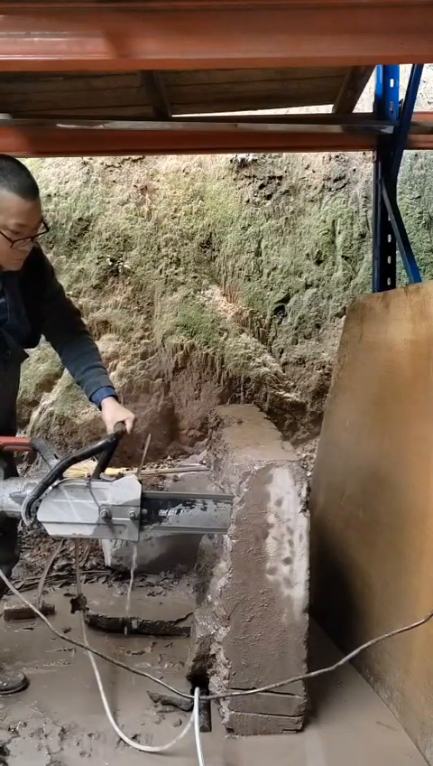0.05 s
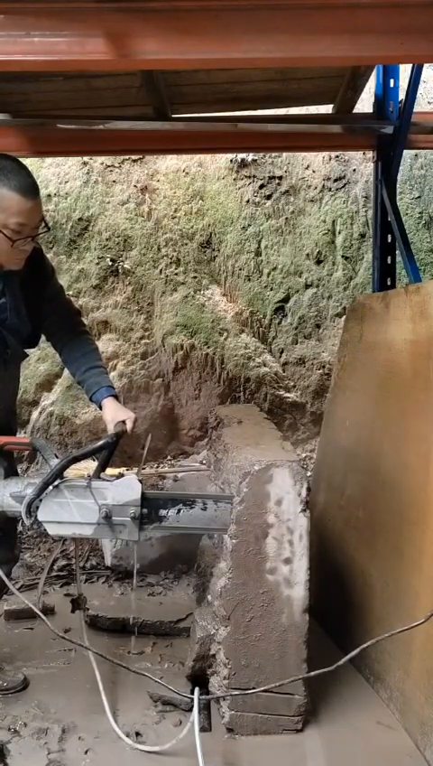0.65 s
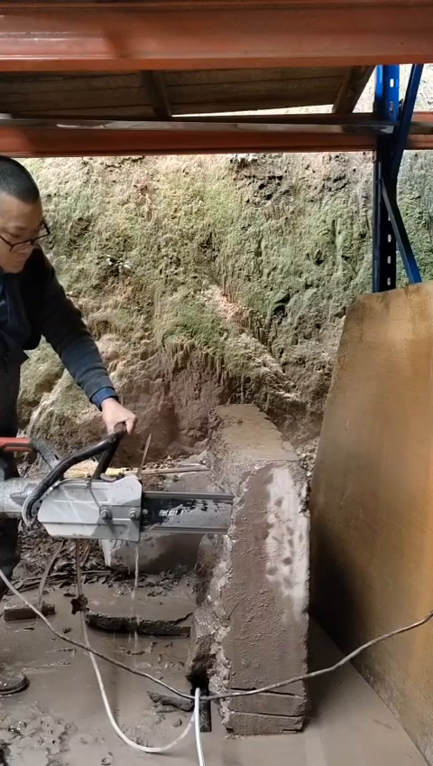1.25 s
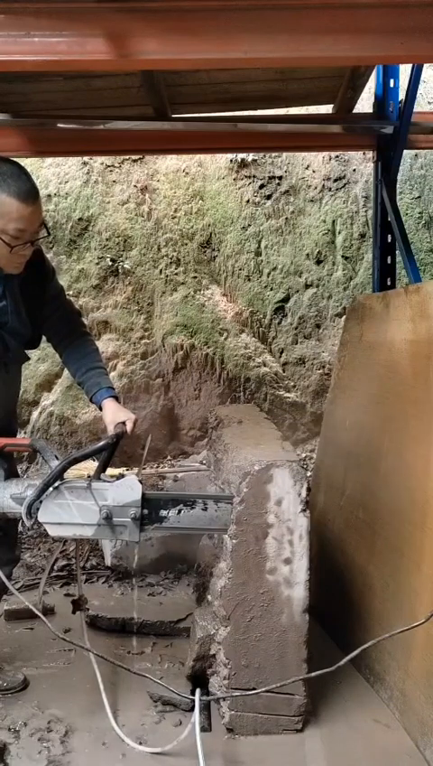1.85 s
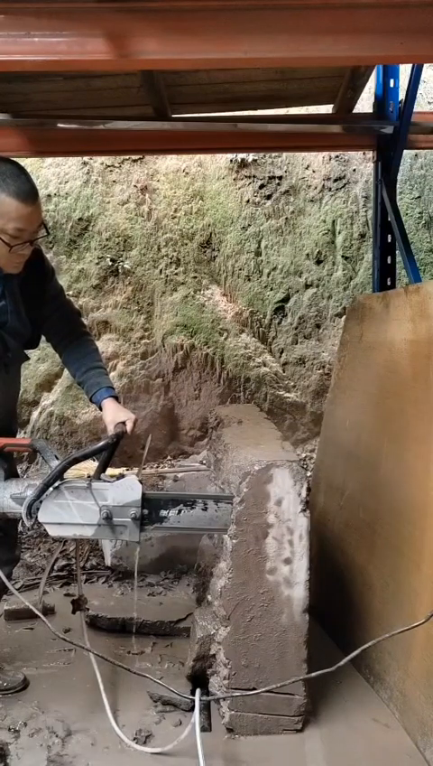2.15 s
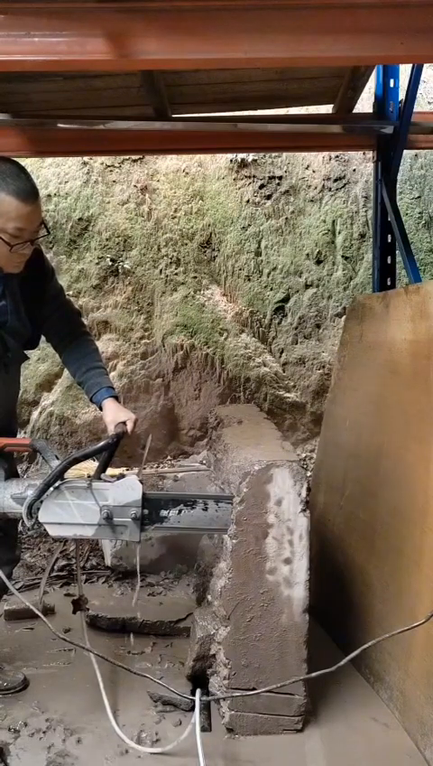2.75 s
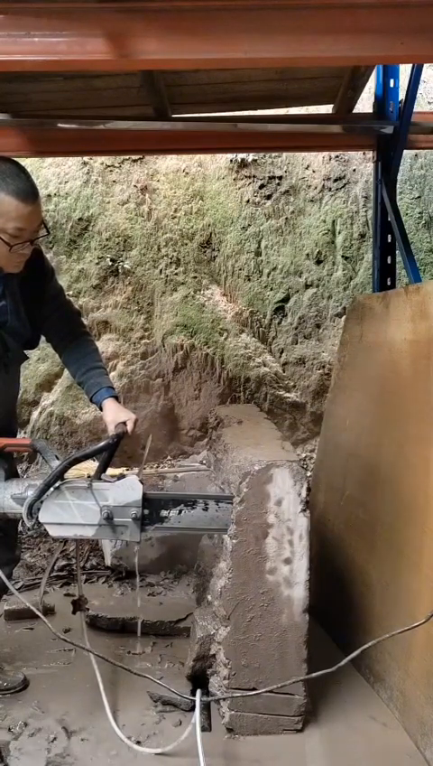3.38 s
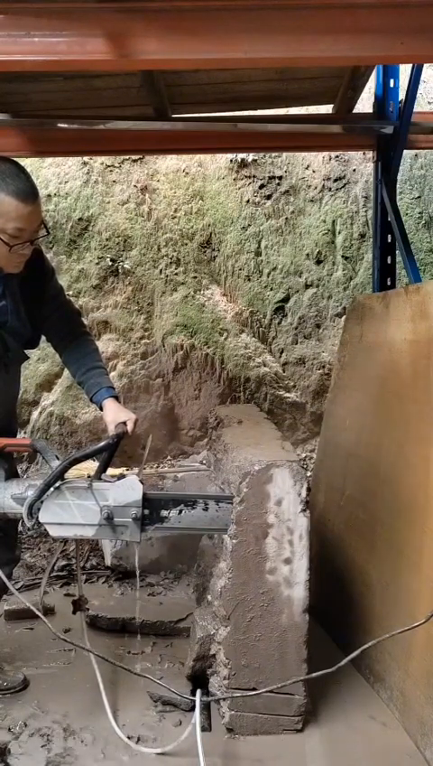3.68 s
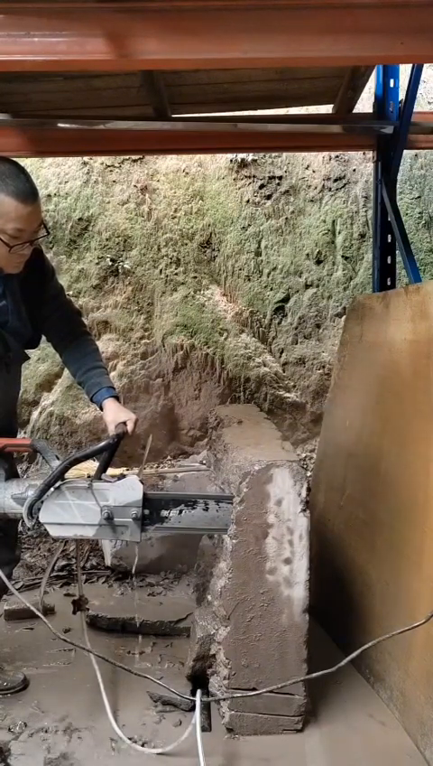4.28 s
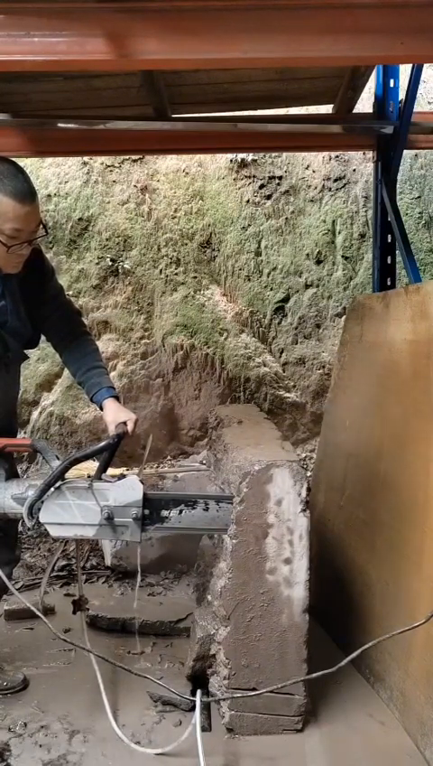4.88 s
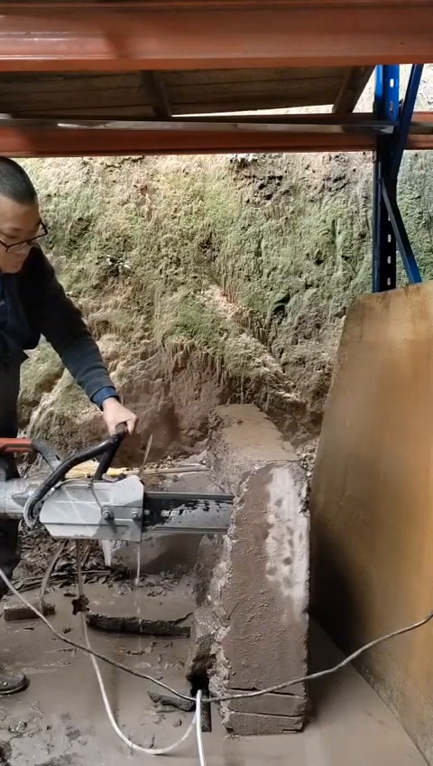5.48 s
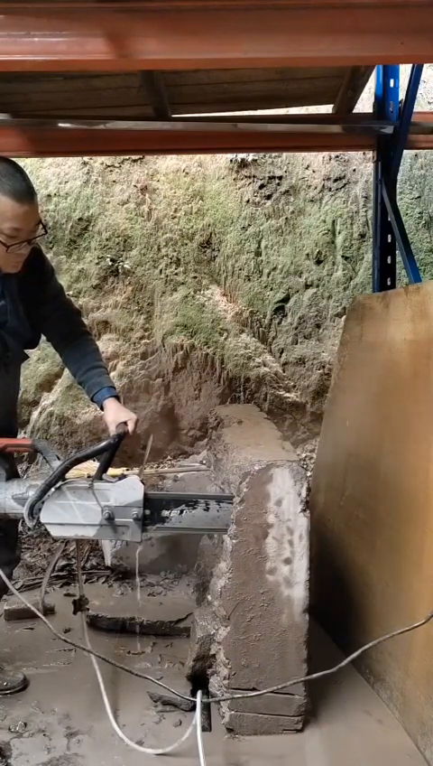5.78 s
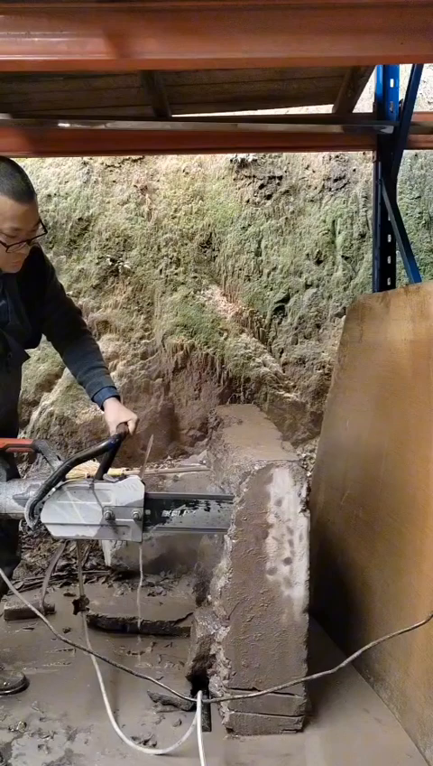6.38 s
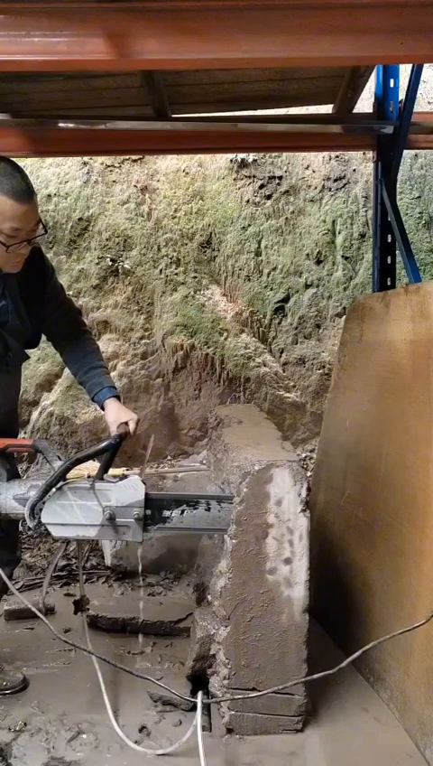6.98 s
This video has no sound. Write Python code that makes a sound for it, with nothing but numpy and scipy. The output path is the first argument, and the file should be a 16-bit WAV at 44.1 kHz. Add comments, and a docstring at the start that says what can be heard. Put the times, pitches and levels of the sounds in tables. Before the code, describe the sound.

A harsh, gritty grinding and motor whine from an electric chainsaw cutting wet stone, over hissing spray and a faint pulsing water pump.

```python
"""An electric chainsaw grinds steadily through a wet stone block in a pit, a few steps away.
Chain links drag grit over the stone and ring the guide bar and the housing; motor, gears and chain whine
through the rasp and sag when the cut binds. One thin squeak rises through the grinding.
Slurry hisses, and a small water pump thumps softly underneath."""
import sys
import numpy as np
from scipy import signal
from scipy.fft import rfft, irfft
from scipy.io import wavfile

SR = 44100
rng = np.random.default_rng(int(sys.argv[2]) if len(sys.argv) > 2 else 0)


def master_out(mix):
    """Clip the mix to full scale and print it as 16-bit PCM to the path in sys.argv[1]."""
    frames = np.transpose(np.atleast_2d(mix))
    ceiling = np.clip(frames, -1, 1)
    pcm = np.round(ceiling * 32767).astype(np.int16)
    wavfile.write(sys.argv[1], SR, pcm)


N = 314433
TIME = np.arange(N) / SR
HZ = np.fft.rfftfreq(N, 1 / SR)
FREE_HZ, LINKS_PER_TURN = 355, 2.949  # free-running shaft speed; chain links per shaft turn

# guide bar and chain resonances: (frequency [Hz], width [Hz], gain [dB])
BAR_MODES = [(843, 71, -2), (946, 82, 3), (1025, 56, 1.5), (1071, 27, 2.2), (1137, 75, 1.5),
             (1198, 60, 3.3), (1357, 116, 0), (1433, 50, 4), (1495, 38, 6.5), (1548, 40, 4.2),
             (1742, 134, 1.6), (1831, 70, 3), (1937, 45, 0), (2030, 60, 1.5), (2120, 130, .5),
             (2193, 28, 2.5), (2286, 45, 3), (2345, 55, 5.6), (2582, 75, 2.2), (2635, 25, 0),
             (2723, 45, .8), (2853, 70, 2.3), (2950, 100, 2.8), (3029, 52, 5.3), (3092, 48, 6.2),
             (3195, 60, 2), (3321, 73, -1.7), (3400, 25, 1), (3547, 45, 2.5), (3596, 26, 1.5),
             (3705, 35, 3), (3770, 35, 1.5), (3875, 40, .5), (3927, 28, 6), (3975, 110, 3), (4035, 35, 1),
             (4160, 90, 5), (4250, 24, 6.5), (4316, 40, 1), (4425, 40, 0), (4535, 100, 5.4),
             (4672, 35, 2.5), (4775, 30, 1), (4825, 40, 1), (4903, 40, 5), (4955, 45, 3), (5028, 35, 2),
             (5091, 35, 5), (5155, 35, 0), (5460, 70, -.5), (5577, 60, -2), (5680, 80, 2.5),
             (5790, 90, -.5), (6030, 150, 0), (6150, 90, 1.5), (6540, 100, -3), (6790, 60, -2),
             (6960, 110, -1), (7570, 160, 2), (7784, 60, -2), (7996, 100, 2), (8118, 60, -.5),
             (8344, 70, -1), (8624, 70, -1), (9202, 85, 2), (11197, 130, 7)]
# strongest ringing modes of the steel bar: (frequency [Hz], width [Hz], relative gain [dB])
STRONG_MODES = [(3441, 40, 10.5), (8002, 45, 9)]


def amp(db):
    """Decibels to gain."""
    return 10 ** (np.asarray(db) / 20)


def unit_rms(x):
    """Scales to rms 1."""
    return x / np.sqrt(np.mean(x ** 2) + 1e-20)


def curve(rows):
    """(time, value) rows interpolated at every sample."""
    return np.interp(TIME, *np.transpose(rows))


def spectrum_gain(points):
    """(Hz, dB) rows as gain per bin, interpolated over log frequency."""
    hz, db = np.transpose(points)
    return amp(np.interp(np.log(HZ + 1), np.log(hz + 1), db))


def swell(at_s, db, length_s):
    """Bell-shaped level change in dB."""
    return db * np.exp(-(2 * (TIME - at_s) / length_s) ** 2)


def wander(hz, hop=64):
    """Smooth random drift, rolled off above hz; rms 1."""
    t = TIME[::hop]
    rolloff = 1 + (np.fft.rfftfreq(len(t), hop / SR) / hz) ** 4
    slow = irfft(rfft(rng.standard_normal(len(t))) / rolloff, len(t))
    return unit_rms(np.interp(TIME, t, slow))


def peaks(modes):
    """Power response of steep-sided resonances."""
    return sum(amp(db) ** 2 / (1 + (2 * (HZ - hz) / width) ** 2) ** 2 for hz, width, db in modes)


def ring(x, gain):
    """Minimum-phase filter: every tick rings after its blow; rms 1."""
    cepstrum = irfft(np.log(np.maximum(gain, 1e-5)), N)
    cepstrum[1:N // 2 + 1] *= 2
    cepstrum[N // 2 + 1:] = 0
    return unit_rms(irfft(rfft(x) * np.exp(rfft(cepstrum)), N))


def steady(x, hz):
    """Evens out level changes slower than hz; rms 1."""
    power = irfft(rfft(x ** 2) * np.exp(-(HZ / hz) ** 2), N)
    return unit_rms(x / np.sqrt(np.maximum(power, 1e-3)))


def grit(turns, grains_per_s, spread_db, grain_share, link_depth, judder_db):
    """Fine abrasion plus single cracking grains, pulsing as each link meets the stone."""
    grains = (rng.random(N) < grains_per_s / SR) * rng.choice([-1, 1], N)
    grains = unit_rms(grains * amp(spread_db * np.minimum(rng.exponential(1, N), 5)))
    force = np.sqrt(1 - grain_share) * rng.standard_normal(N) + np.sqrt(grain_share) * grains
    link_pulse = 1 + link_depth * np.cos(2 * np.pi * LINKS_PER_TURN * turns)
    return force * link_pulse * amp(judder_db * wander(27))


def whine(turns, partials, flutter_db, slip_rad):
    """Partials locked to a turning part; each flutters and slips under the uneven load."""
    out = np.zeros(N)
    for order, db in partials:
        level = amp(db + flutter_db * wander(9))
        phase = 2 * np.pi * (order * turns + rng.random()) + slip_rad * wander(25)
        out += level * np.sqrt(2) * np.cos(phase)
    return out


def throb(turns, depth_db):
    """Level swing in dB from the uneven chain, in step with the drive; depth_db per component."""
    # (period [shaft turns], first peak at free speed [s])
    cycles = [(31.15, .007), (53.05, .139), (4.072, .001)]
    return depth_db * sum(np.cos(2 * np.pi * (turns - s * FREE_HZ) / period) for period, s in cycles)


def pump_knocks(start_s=.01, stroke_s=.40258, rise_s=.0042):
    """Every stroke repeats the same dull knocks; each wakes the modes near its own push."""
    # (time in stroke [s], level [dB], push centre [Hz], push spread [octaves])
    knocks = [(.008, -45.5, 232, .15), (.036, -43.5, 125, .25), (.047, -42.5, 228, .22),
              (.087, -36, 250, 0.11), (0.114, -49, 125, 0.46), (.152, -41, 148, 0.11),
              (.178, -47.5, 230, 0.35), (0.233, -51, 235, .2)]
    # pump and hose: (frequency [Hz], gain [dB], t60 [s])
    modes = [(65, -3, 0.2), (95, 9, 0.09), (130, 0.5, 0.14), (156, 3.5, 0.078), (196, 3, 0.09),
             (224.8, 2, 0.13), (245, -3.5, 0.17)]
    t = TIME[:SR // 2]
    stroke = np.zeros(len(t))
    for at_s, knock_db, centre_hz, octaves in knocks:
        age_s = np.maximum(t - at_s, 0)
        for hz, db, t60_s in modes:
            push = np.exp(-.5 * (np.log2(hz / centre_hz) / octaves) ** 2)
            envelope = (1 - np.exp(-age_s / rise_s)) * np.exp(-np.log(1000) * age_s / t60_s)
            stroke += push * amp(knock_db + db) * envelope * np.sin(2 * np.pi * hz * age_s)
    beats = np.zeros(N)
    beats[(np.arange(start_s, TIME[-1], stroke_s) * SR).astype(int)] = 1
    return signal.fftconvolve(beats, stroke)[:N]


def pump_thumps(hz=63, half_width_s=.018):
    """Each stroke pushes a slug of water down the hose: a couple of slow cycles."""
    # (time [s], level [dB])
    thumps = [(.057, -54), (.476, -49), (.871, -49), (1.265, -50), (1.66, -49.5), (2.086, -52),
              (2.488, -50), (2.88, -49), (3.274, -51), (3.698, -50.5), (4.1, -51), (4.485, -50),
              (4.887, -50), (5.283, -50.5), (5.68, -48), (6.116, -50), (6.499, -49), (6.896, -52)]
    out = np.zeros(N)
    for at_s, db in thumps:
        envelope = amp(db) * np.exp(-((TIME - at_s) / half_width_s) ** 2)
        out += envelope * np.sqrt(2) * np.sin(2 * np.pi * hz * (TIME - at_s))
    return out


def fan(turns, sag_hz, air_db=-50.5, air_db_per_hz=-.3069):
    """The rotor hums at shaft speed and blows cooling air; both fade under load."""
    # rotor hum: (time [s], level [dB])
    hum = [(0, -55), (.65, -51), (1.55, -55.5), (1.95, -55), (2.55, -50), (3.35, -54.5), (4.15, -51),
           (5.1, -50.5), (5.9, -54), (6.4, -57), (7.13, -60)]
    # air vent resonance: (frequency [Hz], width [Hz], gain [dB])
    vent = [(407, 124, 0)]
    air = ring(rng.standard_normal(N), np.sqrt(peaks(vent))) * amp(air_db + air_db_per_hz * sag_hz)
    return air + whine(turns, [(1, 0)], flutter_db=1.8, slip_rad=.27) * amp(curve(hum))


def squeak():
    """One thin, unsteady partial that dips and slides upward."""
    # (time [s], pitch [Hz], level [dB])
    glide = [(1.868, 4100, -60), (1.885, 3770, -34), (1.903, 3950, -41), (1.92, 4160, -31.5),
             (1.936, 4600, -37), (1.948, 5030, -32.5), (1.962, 5250, -60)]
    at_s, hz, db = np.transpose(glide)
    phase = 2 * np.pi * np.cumsum(np.interp(TIME, at_s, hz)) / SR + .6 * wander(120)
    gate = (TIME > at_s[0]) * (TIME < at_s[-1])
    return amp(np.interp(TIME, at_s, db)) * gate * np.sqrt(2) * np.sin(phase)


def slurry(turns, level_db=-24, sputter_s=.055):
    """Wet slurry sprays out of the slot and thins when the cut binds."""
    # spray spectrum: (frequency [Hz], relative density [dB])
    spectrum = [(6000, -50), (10000, -6), (11000, -.5), (11600, 2.3), (11950, 6.3), (12150, 6),
                (12350, 8.3), (12800, 7), (13120, 3.7), (13450, 3.7), (13650, 1.7), (14000, 1.2)]
    # spray flow: (time [s], gain [dB])
    flow = [(0, 0), (3.5, -0.7), (4.2, 0.5), (5.2, -0.2), (5.9, -2), (6.25, -1), (7.13, -1.5)]
    # brief dips of the hiss: (time [s], gain [dB])
    sputters = [(2.11, -1.3), (4.36, -1.5), (6.47, -2)]
    sputter_db = sum(swell(at_s, db, sputter_s) for at_s, db in sputters)
    drops = grit(turns, grains_per_s=2300, spread_db=2.5, grain_share=.13, link_depth=.1, judder_db=.8)
    return ring(drops, spectrum_gain(spectrum)) * amp(level_db + curve(flow) + sputter_db)


def bar_singing():
    """The rubbing chain keeps a few bar modes ringing; now and then one flares."""
    # (frequency [Hz], width [Hz], base level [dB])
    modes = [(2027, 36, -45.8), (3035, 52, -47), (3438, 31, -43.2), (8002, 36, -48.6)]
    # (time [s], approximate mode frequency [Hz], rise [dB], length [s])
    flares = [(.08, 3035, 10, .2), (1.01, 3440, 14, .08), (1.28, 2027, 10, 0.23), (1.33, 3440, 8, .3),
              (1.48, 3440, 5, .08), (1.482, 3035, 10, .1), (1.66, 3035, 13, .13), (1.698, 2027, 7, 0.62),
              (1.868, 3440, 13, .07), (2.04, 3440, 13, 0.12), (2.138, 2027, 16.5, 0.063),
              (2.76, 2027, 10, .18), (2.763, 3440, 12, .08), (2.78, 3035, 4, .09), (3.023, 2027, 9, .14),
              (3.18, 3440, 5.5, .07), (3.457, 3440, 9, .08), (3.66, 3035, 10, .24), (4.29, 2027, 11, 0.076),
              (4.682, 3440, 11, 0.22), (4.98, 3440, 11, .09), (5.678, 2027, 7, 0.18), (5.87, 3035, 14, .08),
              (5.89, 3440, 6, .1), (7.02, 2027, 10, 0.078)]
    out = np.zeros(N)
    for hz, width_hz, db in modes:
        flare_db = sum(swell(at_s, rise_db, length_s)
                       for at_s, mode_hz, rise_db, length_s in flares if abs(mode_hz / hz - 1) < .1)
        tone = ring(rng.standard_normal(N), np.sqrt(peaks([(hz, width_hz, 0)])))
        out += steady(tone, hz=9) * amp(db + flare_db)
    return out


def drive(turns, gear_ratio=4):
    """Motor and gears whine through the bar's modes, the links through the sprocket guard."""
    # motor and fan: (order [x shaft speed], relative level [dB])
    motor_partials = [(2, -54), (5, -63), (7, -46), (8, -53), (9, -46.5), (10, -56.5), (12, -49), (13, -50)]
    # gears: (order [x sprocket speed], relative level [dB])
    gear_partials = [(17, -50.5), (18, -54.5), (21, -50.5), (33, -46), (35, -58), (39, -49), (41, -42.5),
                     (42, -60), (47, -47), (49, -57), (51, -59), (53, -51)]
    # links on the sprocket: (order [x shaft speed], relative level [dB])
    link_partials = [(2.699, -51.8), (2.949, -51.3), (5.89, -53.5)]
    # link whine coming and going: (time [s], gain [dB])
    link_gain = [(0, 3), (.7, 7.5), (1.2, 2.5), (1.7, -4), (2.4, 5), (2.9, 1), (3.3, -4), (4.05, 5.5),
                 (4.55, -2), (5.3, 3), (5.75, 8), (6.05, -1), (6.45, -1), (6.7, 3), (7.13, 7)]
    # sprocket guard: (frequency [Hz], width [Hz], gain [dB])
    guard_modes = [(1008, 300, -1.5), (1990, 200, 3)]
    motor = amp(-1) * whine(turns, motor_partials, flutter_db=4, slip_rad=.19)
    gears = amp(-5.5) * whine(turns / gear_ratio, gear_partials, flutter_db=4, slip_rad=.14)
    links = amp(curve(link_gain)) * whine(turns, link_partials, flutter_db=2, slip_rad=.45)
    via_bar = rfft(motor + gears) * np.sqrt(1 + peaks(BAR_MODES + STRONG_MODES))
    via_guard = rfft(links) * np.sqrt(peaks(guard_modes))
    return irfft(via_bar + via_guard, N)


def housing(turns, sag_hz, level_db=-37, db_per_hz=-.0638):
    """Grit shakes the housing into a drone, less as the motor sags."""
    # (frequency [Hz], width [Hz], relative gain [dB])
    modes = [(525, 70, 3.6), (577, 26, 13.0), (598, 17, 17.6), (623, 16, 14.5), (658, 28, 14.0),
             (688, 40, 9.5), (709, 31, 15.8)]
    # swells and dips of the drone: (time [s], gain [dB], length [s])
    swells = [(0.457, -2, 0.15), (1.45, -2, 0.2), (3.552, 0.5, 0.71), (4.38, -6, 0.11), (4.662, 2, 0.24),
              (5.434, 3.5, 0.18), (5.708, 8, 0.042), (6.617, -5.5, 0.11), (6.828, 4, 0.11)]
    rattle = grit(turns, grains_per_s=400, spread_db=1, grain_share=.054, link_depth=.049, judder_db=-1.5)
    drone = steady(ring(rattle, np.sqrt(peaks(modes))), hz=8.5)
    drone_db = level_db + db_per_hz * sag_hz + sum(swell(*row) for row in swells)
    return drone * amp(drone_db + throb(turns, depth_db=.4))


def bar_growl(turns, bite_db, growl_per_bite=.8):
    """The bar's bending modes growl when it is pressed."""
    # (frequency [Hz], width [Hz], relative gain [dB])
    modes = [(1360, 110, -4), (1433, 55, 0), (1492, 50, -2)]
    # (time [s], base level [dB])
    levels = [(0, -46), (1.5, -48), (1.8, -48), (2.25, -45), (2.7, -44), (3.3, -38.5), (3.9, -52),
              (4.3, -44), (5.2, -46), (5.6, -36.5), (5.95, -36.5), (6.3, -40), (7.13, -38)]
    force = grit(turns, grains_per_s=700, spread_db=6, grain_share=.86, link_depth=.1, judder_db=-1.5)
    growl = steady(ring(force, np.sqrt(peaks(modes))), hz=8)
    return growl * amp(curve(levels) + growl_per_bite * bite_db + throb(turns, depth_db=1))


def moving_contact(x, depth_db, rate_hz, bands):
    """As the contact moves along the bar, each band of modes swells and fades on its own; rms 1."""
    position = np.interp(np.log(HZ + 1), np.log([1500, 7000]), [0, bands - 1])
    spectrum = rfft(x)
    parts = (irfft(spectrum * np.maximum(1 - abs(position - k), 0), N) for k in range(bands))
    return unit_rms(sum(part * amp(depth_db * wander(rate_hz)) for part in parts))


def bite(x, db, centre_hz=1850, width_hz=1400):
    """Pressing harder swells the bar's low modes by db."""
    low = irfft(rfft(x) / (1 + (2 * (HZ - centre_hz) / width_hz) ** 8), N)
    return x + low * (amp(db) - 1)


def cut(turns, rasp_db=-23, skid_s=.032):
    """Grit dragged over stone makes the bar rasp and growl; the chain catches and skids."""
    # grit on stone: (frequency [Hz], relative density [dB])
    spectrum = [(25, -31), (48, -27), (88, -18), (130, -24.5), (270, -21), (380, -18.5), (780, -14.5),
                (1700, -6), (3200, -3), (4500, -5), (5300, -5), (7000, -5), (8400, -11), (9600, -8.5),
                (12000, -19)]
    # hard spots: (time [s], rasp gain [dB], low-mode gain [dB], length [s])
    catches = [(0.2, 1.2, 2, 0.034), (0.792, 0.5, 3, .03), (1.022, 0.8, 0, 0.054), (1.145, 2.5, 0, 0.042),
               (1.25, -0.5, 2, .03), (1.356, 0.5, 1.5, .03), (1.613, 1, 2, .031), (1.867, 1.7, 0, 0.046),
               (2.413, 0, 5, 0.04), (2.617, 2.2, 2, 0.025), (2.7, 0, 2.7, .04), (2.783, 2, -1, .06),
               (2.873, 2, 0, .029), (3.056, 1.5, 3.6, .032), (3.817, 0, 3.5, .025), (4.748, .5, 2.5, 0.033),
               (4.982, 1, -1, .035), (5.464, 1, 2.5, .03), (5.553, 2.5, -3, .03), (5.65, 1, 0, .03),
               (5.833, .8, 1, .025), (6.42, 0, 1.6, .024), (6.558, 0.5, 3, 0.021), (6.67, 2.2, -0.5, .035),
               (6.987, 2.3, -5, .034)]
    # chain losing its bite: (time [s], rasp gain [dB])
    skids = [(.38, -1), (2.18, -2.5), (2.34, -2), (2.48, -1), (2.57, -4), (5.41, -2)]
    catch_db = sum(swell(at_s, db, length_s) for at_s, db, _, length_s in catches)
    bite_db = sum(swell(at_s, db, length_s) for at_s, _, db, length_s in catches)
    skid_db = sum(swell(at_s, db, skid_s) for at_s, db in skids)
    force = grit(turns, grains_per_s=2500, spread_db=3, grain_share=.15, link_depth=.049, judder_db=.38)
    steel = np.sqrt(1 + peaks(BAR_MODES) + .32 * peaks(STRONG_MODES))
    rasp = ring(force, spectrum_gain(spectrum) * steel)
    rasp = moving_contact(rasp, depth_db=.84, rate_hz=37, bands=12)
    rasp = moving_contact(rasp, depth_db=1.1, rate_hz=14, bands=38)
    rasp = bite(steady(rasp, hz=5), bite_db + throb(turns, depth_db=.4))
    return rasp * amp(rasp_db + catch_db + skid_db) + bar_growl(turns, bite_db)


def scene():
    """Saw and pump, the same in both channels."""
    # motor sagging as the bar leans into the cut: (time [s], shaft speed [Hz])
    speed = [(0.0, 353.2), (0.25, 353.0), (1.0, 350.0), (1.4, 345.2), (1.8, 343.8), (2.3, 347.8),
             (2.57, 348.0), (2.8, 342.2), (3.05, 338.8), (3.55, 345.5), (3.95, 346.6), (4.35, 352.6),
             (5.4, 355.3), (5.78, 334.0), (5.9, 328.0), (6.15, 321.9), (6.4, 324.0), (6.7, 326.8),
             (7.13, 327.0)]
    shaft_hz = curve(speed)
    sag_hz = FREE_HZ - shaft_hz
    turns = np.cumsum(shaft_hz * (1 + .00076 * wander(9.3))) / SR
    grinding = cut(turns) + housing(turns, sag_hz) + slurry(turns) + bar_singing()
    sound = grinding + drive(turns) + fan(turns, sag_hz) + squeak() + pump_knocks() + pump_thumps()
    return np.array([sound, sound])


def record(dry, low_hz=38, high_hz=14060):
    """Bass roll-off and a steep treble limit."""
    thin = signal.sosfilt(signal.butter(2, low_hz, "highpass", fs=SR, output="sos"), dry)
    lowpass = signal.firwin(1023, high_hz, window=("kaiser", 9), fs=SR)
    return signal.oaconvolve(thin, lowpass[None], "same")


dry = scene()
out = record(dry)
master_out(out)
```